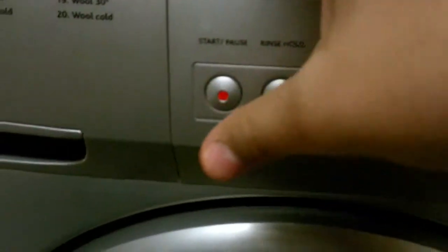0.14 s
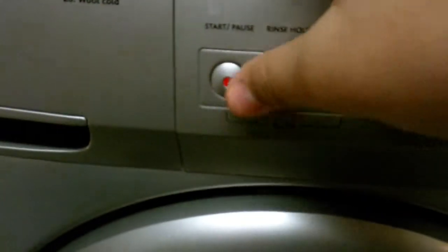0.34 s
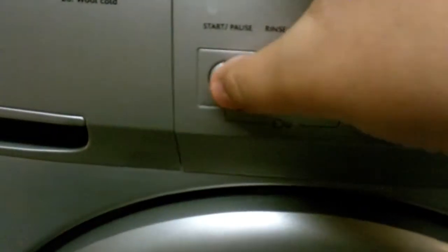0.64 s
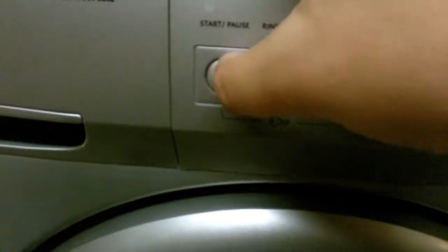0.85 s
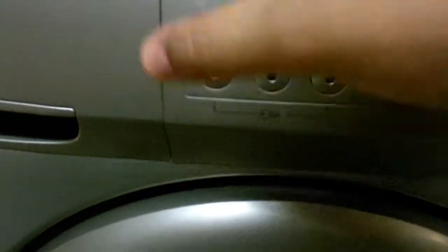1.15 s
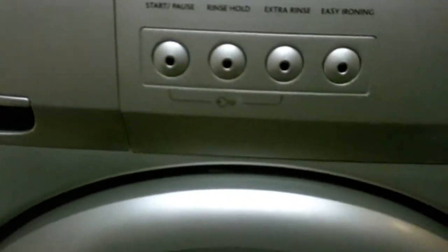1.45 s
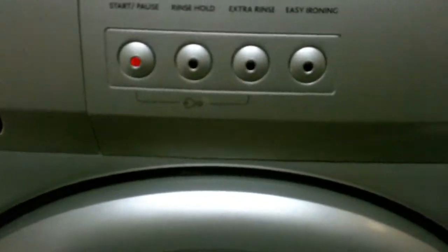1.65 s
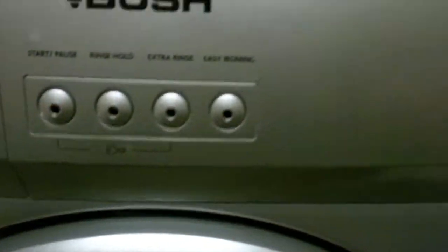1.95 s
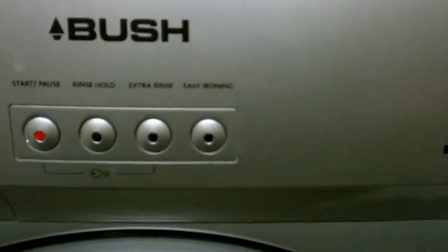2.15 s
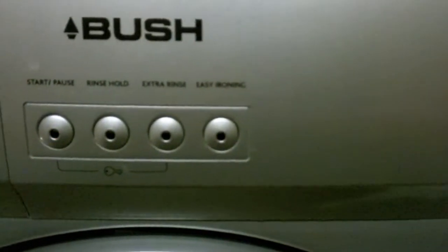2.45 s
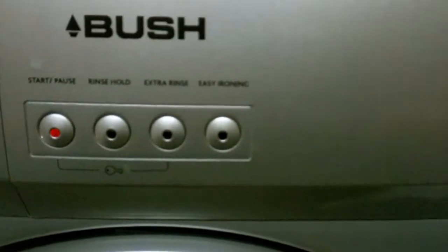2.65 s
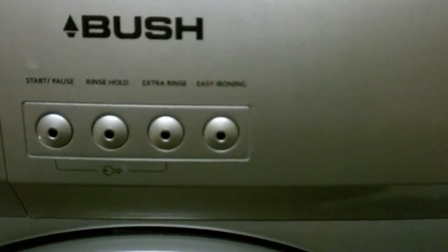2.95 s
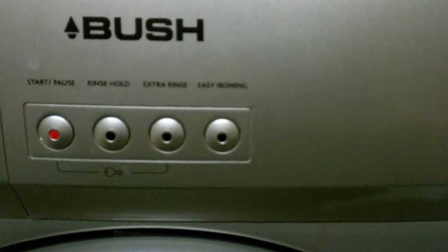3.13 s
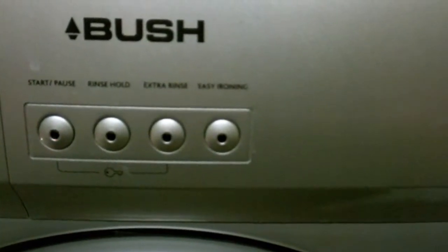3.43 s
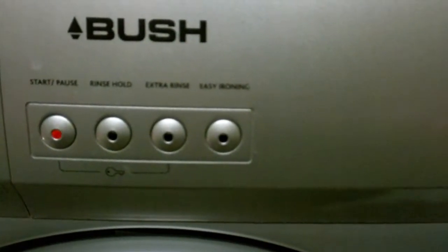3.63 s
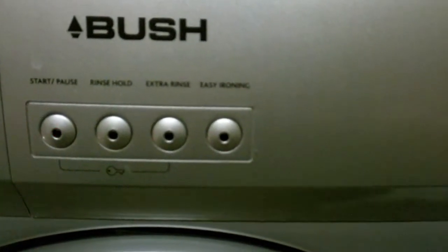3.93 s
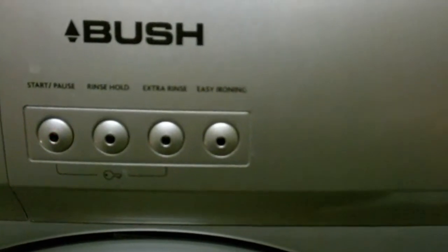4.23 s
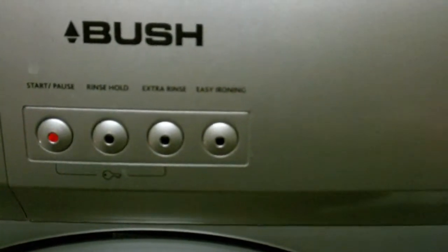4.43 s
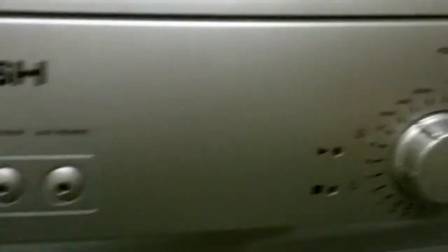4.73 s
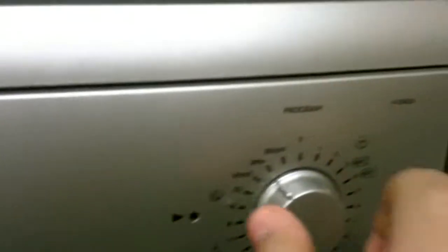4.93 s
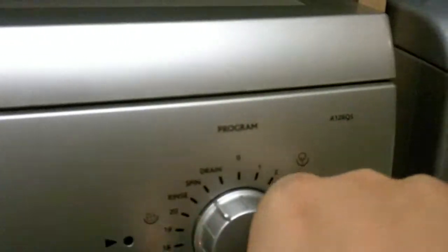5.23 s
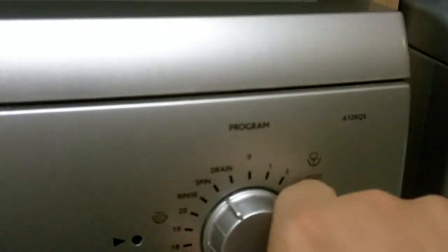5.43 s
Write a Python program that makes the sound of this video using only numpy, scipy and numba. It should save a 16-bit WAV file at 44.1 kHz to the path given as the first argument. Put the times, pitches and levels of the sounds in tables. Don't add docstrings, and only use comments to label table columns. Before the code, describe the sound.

A washing machine spins hard, its steel cabinet droning and roaring continuously. The motor lets go early on, tones shift and begin sinking very slowly, and the tub booms and knocks twice hard enough to overload the small close microphone. Brief faint finger rubs come between. Later a strong low lurch leads into a rapid, uneven throb; the drum is still spinning fast at the end.

```python
import sys
import numpy as np
from scipy import signal
from scipy.fft import rfft, irfft, next_fast_len
from scipy.io import wavfile
from scipy.ndimage import uniform_filter1d, minimum_filter1d
from numba import njit

SR = 44100
rng = np.random.default_rng(int(sys.argv[2]) if len(sys.argv) > 2 else 0)


def rack_gain(trim_db):
    fader = np.asarray(trim_db, float)
    return 10 ** (fader / 20)


def dump(signal):
    limited = np.clip(np.atleast_2d(signal).T, -1, 1)
    pcm = np.round(limited * 32767).astype(np.int16)
    wavfile.write(sys.argv[1], SR, pcm)


N = 246071
STEP = 64

FULL_SPIN_PER_S, CUT_S = 20.02, 1.796
SLOWING_PER_S = .0308
BELT_PER_DRUM = .7473
# start_s, share
DRIVE = [(1.75, 1), (2.25, 0)]
# start_s, motor_turns_per_drum_turn
PULLEY = [(1.75, 12.255), (1.85, 12.21)]

# multiple_of_drum_speed, coasting_level_db, extra_when_pulling_db
DRUM_TONES = [(1, -66.5, 3.5), (2, -69, 2.5), (3, -50.5, 3.5), (4, -51, -4.5), (5, -37, -2), (6, -49, 4),
              (7, -44, 2), (8, -54, 11.5), (9, -34, -2.5), (10, -47, -3.5), (11, -44, 2), (12, -46.5, -5),
              (13, -41, 4.5), (14, -39, -1.5), (15, -38.5, 1), (16, -43.5, 0), (17, -42, 1.5),
              (18, -36.5, 2), (19, -41, 0.5), (20, -37, 0), (21, -38, 9), (22, -40.5, -4), (23, -31.5, 3.5),
              (24, -42.5, -14), (25, -31, 3.5), (26, -41.5, 4), (27, -45, 6.5), (28, -43.5, 5.5),
              (29, -40.5, -4.5), (30, -48, 4.5)]
# pitch_hz, level_db
UPPER_COLOUR = [(620, -49.5), (800, -49), (1000, -46.5), (1250, -46.5), (1550, -44), (1800, -45)]
SCATTER_DB, PULL_SCATTER_DB = 2.0, 1.5
SINGERS = [33, 35, 36, 40, 48, 52, 60, 62, 65, 67, 68, 85, 86]
# coasting_level_db, extra_when_pulling_db
SINGER_LEVELS = [(-48, 14), (-45, 5), (-45, -5.5), (-42.5, -6), (-47.5, 1.5), (-44, 3), (-51, 2.5),
                 (-49, 4), (-45, 7), (-41.5, -11), (-47.5, 6.5), (-45, -4), (-44, 10.5)]
# pitch_hz, level_db
FINE_COLOUR = [(1600, -39), (1800, -45), (2100, -54), (2800, -54), (4000, -78.5)]
PAIRED_DB, PULL_DB, SWAP_MULTIPLE = 1.5, -0.5, 35

# multiple_of_belt_loop_rate, coasting_level_db, extra_when_pulling_db
BELT_TONES = [(7.08, -58, -0.5), (15, -55, -6), (22.9, -47.5, 1), (24.89, -39, 1), (25.93, -35.5, -3),
              (26.9, -37, -16), (28.86, -37.5, 1), (43.1, -51, -1.5), (47.08, -51, 9), (50.7, -47.5, -8.5),
              (52.85, -52.5, 7), (54, -59, 1), (56.8, -57, 0.5), (58.4, -53, 2.5), (60, -46.5, 2)]
# multiple_of_motor_speed, coasting_level_db, extra_when_pulling_db
SHAFT_TONES = [(1, -43.5, -8), (2, -38, 2), (3, -46, 1), (4, -47.5, -7.5), (5, -43.5, -6.5)]
# multiple_of_motor_speed, coasting_level_db, extra_when_pulling_db
WHINE_TONES = [(13, -55, 1.5), (13.98, -52, -7), (15.98, -57, 2), (17.97, -54.5, 0), (20, -68, -0.5),
               (21.1, -64, 7.5), (27, -66.5, 1.5), (30, -61.5, 1), (35.96, -44, -3), (54, -57.5, 2.5)]
WHINE_DB, WHINE_DB_PER_SLOWING = 0.4, 0.4
WHINE_PATCHY_DB, WHINE_PATCH_HZ = 1.8, 4.0

# pitch_hz, width_hz, level_db
CABINET = [(55.2, 1.7, 9), (93.4, 12, -5.5), (108, 2, -4.5), (128.4, 3.8, -9), (136.6, 16, 11),
           (166.3, 12, 3), (202.6, 11, 13.5), (221, 27.6, 8), (239.6, 7.1, 11), (254.5, 9.8, 4.5),
           (300, 4.6, -2.5), (322.7, 4.8, 13.5), (350, 2.2, 0), (372.2, 11, 8.5), (401.4, 40, 2),
           (474.8, 6.3, -11), (482.2, 11, 7), (531, 5.3, -3), (603.5, 105, 6), (658.7, 120, 8.5),
           (683, 11, 7), (766, 7.2, 13.5), (836.5, 101, 11.5), (906, 23, 4.5), (959, 40, 8.5),
           (1052, 62, 7), (1145, 7.2, 6.5), (1203, 166, 9), (1349, 33, 11.5), (1425, 5.8, 0.5)]
# pitch_hz, level_db_per_hz
ROAR = [(20, -35.5), (60, -25), (110, -19.5), (180, -6), (400, -4), (700, -2), (1300, -5), (1800, -6),
        (2400, -14.5), (3500, -19), (4300, -27.5), (16000, -31)]
# pitch_hz, width_hz, level_db
BOOM = [(225.5, 60, -1), (390, 69, -2.5)]
BOOM_REST_DB = -8.5
# peak_s, over_rest_db, length_s
LURCHES = [
    (0.0, 10, 0.19),
    (1.097, 2, 0.46),
    (1.8, 14, 0.35),
    (2.161, 15.5, 0.11),
    (2.462, 14, 0.17),
    (3.548, 3.5, 0.16),
    (4.068, 18.5, 0.12),
    (5.58, 4.5, 0.16),
]
# peak_s, signed_height, pitch_hz
KNOCKS = [
    (1.9158, -1.07, 620),
    (2.4186, 1.24, 900),
]
KNOCK_LOW_HZ = 130
THROB_DB, JOLT_DIES_TURNS = .6, .35
LOOSE_S, LOOSE_THROB_DB, LOOSE_RISE_S, LOOSE_SETTLE_S = 4.65, 4.6, .2, .55
THROB_CUT_HZ = 1800

# start_s, level_db
NEARNESS = [(0, -15), (.4, -14.5), (1.2, -13.5), (2.15, -13), (2.7, -14), (3.25, -14.5), (3.6, -13.5),
            (4.8, -14), (5.58, -14)]
MEAN_DB = -14.3
HEADROOM = .9
# peak_s, level_db, length_s
RUSTLES = [
    (0.915, -36, 0.0066),
    (1.136, -31, .004),
    (1.988, -32.5, 0.0091),
    (2.05, -33.5, 0.0092),
    (2.48, -35.5, .008),
    (2.542, -32, .006),
]
# pitch_hz, level_db
MIC_TILT = [(4300, 0), (4700, -12), (5200, -12), (6500, -15), (7800, -18), (9600, -22), (11200, -30),
            (11400, -44), (12200, -56), (12700, -44), (13000, -33), (14200, -34), (14400, -38),
            (16000, -40)]
# pitch_hz, width_hz, level_db
MIC_NOTCHES = [(4820, 170, -13), (5830, 380, -16), (8540, 360, -27)]
MIC_LIMIT = .99


def in_time(rows):
    s, *columns = np.transpose(rows)
    return [np.interp(np.arange(N) / SR, s, column) for column in columns]


def at_hz(points, hz):
    table_hz, db = np.array(points).T
    return np.interp(np.log(hz + 1), np.log(table_hz), db)


def bumps_db(modes, hz):
    return sum(db / (1 + (2 * (hz - centre) / width) ** 2) for centre, width, db in modes)


def rms_one(x):
    return x / np.sqrt(np.mean(np.abs(x) ** 2, axis=-1, keepdims=True) + 1e-20)


def shaped(x, response_db):
    size = next_fast_len(N + 4096)
    hz = np.arange(size // 2 + 1) * SR / size
    return irfft(rfft(x, size) * rack_gain(response_db(hz)), size)[:N]


def swell(s, rise_s, fall_s):
    t = np.arange(N) / SR - s
    return np.exp(-(t / np.where(t < 0, rise_s, fall_s)) ** 2)


def drift(rate_hz, count):
    r = np.exp(-2 * np.pi * rate_hz * STEP / SR)
    white = rng.standard_normal((count, 2, N // STEP + 1001))
    slow = signal.lfilter([1], [1, -2 * r, r * r], white[:, 0] + 1j * white[:, 1])
    return rms_one(slow[:, 1000:])


@njit
def sum_lines(turns, multiples, real, imag, step):
    out = np.zeros(len(turns))
    last = real.shape[1] - 2
    for k in range(len(multiples)):
        for j in range(last + 1):
            first = j * step
            end = len(turns) if j == last else first + step
            pointer = np.exp(2j * np.pi * multiples[k] * turns[first])
            turn = np.exp(2j * np.pi * multiples[k] * (turns[first + step] - turns[first]) / step)
            height = real[k, j] + 1j * imag[k, j]
            change = (real[k, j + 1] + 1j * imag[k, j + 1] - height) / step
            for i in range(first, end):
                out[i] += (height * pointer).real
                pointer *= turn
                height += change
    return out


def turning_part(per_s, tones, loose, loose_hz):
    multiple, coast_db, pull_db = np.transpose(tones)[:, :, None]
    multiple = np.round(multiple)
    pull = in_time(DRIVE)[0][::STEP]
    level_db = coast_db + pull_db * pull + bumps_db(CABINET, multiple * per_s[::STEP])
    start = np.exp(2j * np.pi * rng.random((len(tones), 1)))
    wander = drift(loose_hz, len(tones))[:, :level_db.shape[1]]
    wander = np.sqrt(1 - loose) + np.sqrt(loose) * wander
    height = np.sqrt(2) * rack_gain(level_db) * start * wander
    turns = np.cumsum(per_s) / SR
    return sum_lines(turns, multiple[:, 0].copy(), height.real.copy(), height.imag.copy(), STEP)


def drum_speed():
    coasting_s = np.maximum(np.arange(N) / SR - CUT_S, 0)
    return FULL_SPIN_PER_S * np.exp(-SLOWING_PER_S * coasting_s)


def paired_db(k):
    return PULL_DB + PAIRED_DB * (-1) ** k * np.sign(k - SWAP_MULTIPLE + .5)


def upper_tones(per_s):
    uneven = rng.standard_normal((60, 2)) * [SCATTER_DB, PULL_SCATTER_DB]
    rows = {}
    for k, (coast, pull) in zip(range(31, 91), uneven):
        rows[k] = (k, at_hz(UPPER_COLOUR, k * per_s[0]) + coast, paired_db(k) + pull)
    for k, levels in zip(SINGERS, SINGER_LEVELS):
        rows[k] = (k, *levels)
    return list(rows.values())


def drum(per_s):
    upper = upper_tones(per_s)
    fine = [(k, at_hz(FINE_COLOUR, k * per_s[0]), paired_db(k)) for k in range(91, 200)]
    low_part = turning_part(per_s, DRUM_TONES[8:] + upper[:8], loose=.04, loose_hz=.7)
    middle_part = turning_part(per_s, upper[8:], loose=.22, loose_hz=.9)
    return low_part + middle_part + turning_part(per_s, fine, loose=.4, loose_hz=1.5)


def deep_sway(per_s):
    return turning_part(per_s, DRUM_TONES[:8], loose=.04, loose_hz=.7)


def belt(per_s):
    return turning_part(per_s * BELT_PER_DRUM, BELT_TONES, loose=.06, loose_hz=.8)


def motor(drum_per_s):
    per_s = drum_per_s * in_time(PULLEY)[0]
    hum = turning_part(per_s, SHAFT_TONES, loose=.1, loose_hz=.9)
    wobble = 1 + .0011 * np.sin(2 * np.pi * np.cumsum(drum_per_s) / SR)
    whine = turning_part(per_s * wobble, WHINE_TONES, loose=.25, loose_hz=16.0)
    patches = drift(WHINE_PATCH_HZ, count=1)[0].real
    patches = np.interp(np.arange(N) / STEP, np.arange(len(patches)), patches)
    whine_db = WHINE_DB + WHINE_DB_PER_SLOWING * (FULL_SPIN_PER_S - drum_per_s)
    return hum + rack_gain(whine_db + WHINE_PATCHY_DB * patches) * whine


def throbbing(machine, per_s):
    throb_db = THROB_DB + LOOSE_THROB_DB * swell(LOOSE_S, LOOSE_RISE_S, LOOSE_SETTLE_S)
    turns_since_jolt = (np.cumsum(per_s) / SR - .25) % 1
    beat = 2 * np.exp(-turns_since_jolt / JOLT_DIES_TURNS) - .9
    throb = uniform_filter1d(throb_db * beat, size=90)
    panels = shaped(machine, lambda hz: -10 * np.log10(1 + (hz / THROB_CUT_HZ) ** 4))
    return machine + (rack_gain(throb) - 1) * panels


def eased(x):
    room = minimum_filter1d(np.minimum(1, HEADROOM / (np.abs(x) + 1e-9)), size=161)
    return x * uniform_filter1d(uniform_filter1d(room, size=81), size=81)


def knocked(machine):
    t, jolts = np.arange(N) / SR, 0
    for s, height, hz in KNOCKS:
        share = np.exp(-((t - s) * hz * 2.1) ** 2)
        swing = height * np.cos(2 * np.pi * hz * (t - s))
        jolts = jolts + share * (swing - machine)
    return machine + shaped(jolts, lambda hz: -10 * np.log10(1 + (KNOCK_LOW_HZ / (hz + 1)) ** 4))


def boom():
    noise, out = rng.standard_normal(N), 0
    for hz, width, db in BOOM:
        band = signal.butter(2, [hz - width / 2, hz + width / 2], "band", fs=SR, output="sos")
        out = out + rack_gain(db) * rms_one(signal.sosfilt(band, noise))
    boom_db = BOOM_REST_DB + sum(db * swell(s, length, length) for s, db, length in LURCHES)
    return rack_gain(boom_db - 32) * out


def roar(level_db, cabinet_share):
    def colour(hz):
        return at_hz(ROAR, hz) + cabinet_share * bumps_db(CABINET, hz)
    return rack_gain(level_db) * rms_one(shaped(rng.standard_normal(N), colour))


def rustle():
    bright = signal.butter(4, [5000, 11000], "band", fs=SR, output="sos")
    hiss = signal.sosfilt(bright, rng.standard_normal(N))
    return hiss * sum(rack_gain(db) * swell(s, length / 2, length) for s, db, length in RUSTLES)


def scene():
    per_s = drum_speed()
    machine = drum(per_s) + belt(per_s) + motor(per_s)
    machine = machine + boom() + roar(level_db=-22.0, cabinet_share=0.36)
    shaken = deep_sway(per_s) + throbbing(machine, per_s)
    nearness_db, = in_time(NEARNESS)
    near = eased(rack_gain(nearness_db - MEAN_DB) * shaken)
    return (knocked(near) + rustle())[None]


def roll_off(x):
    return signal.sosfilt(signal.butter(12, 15280, fs=SR, output="sos"), x)


def record(dry):
    heard = shaped(dry[0], lambda hz: at_hz(MIC_TILT, hz) + bumps_db(MIC_NOTCHES, hz))
    return roll_off(np.clip(heard, -MIC_LIMIT, MIC_LIMIT)[None])


dry = scene()
out = record(dry)
dump(out)
```